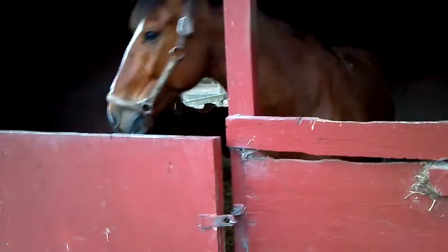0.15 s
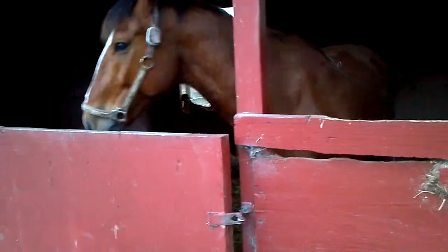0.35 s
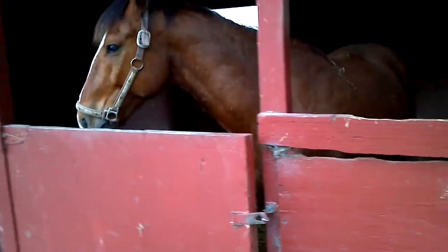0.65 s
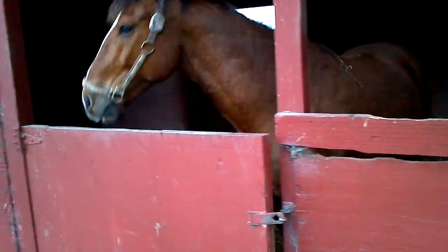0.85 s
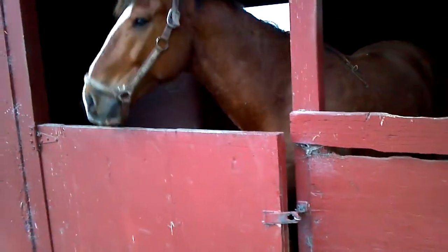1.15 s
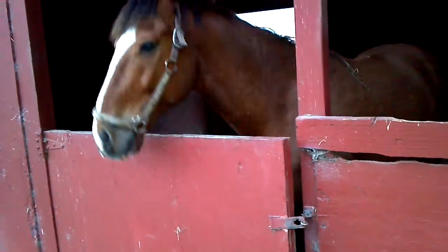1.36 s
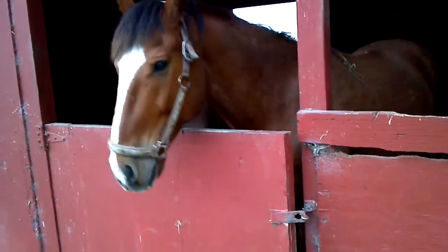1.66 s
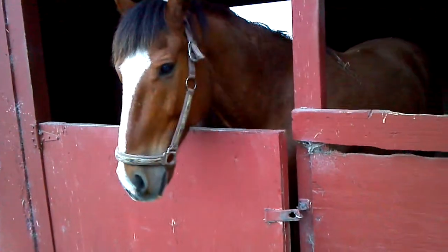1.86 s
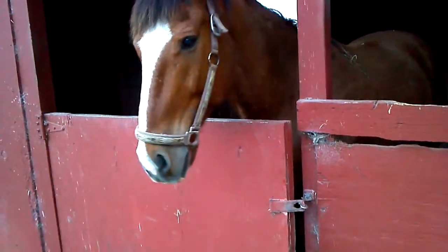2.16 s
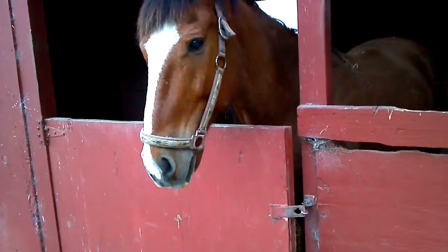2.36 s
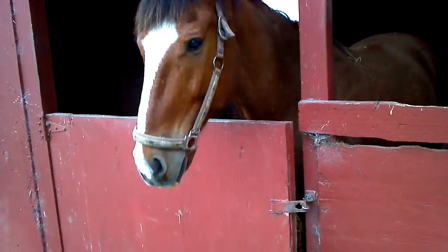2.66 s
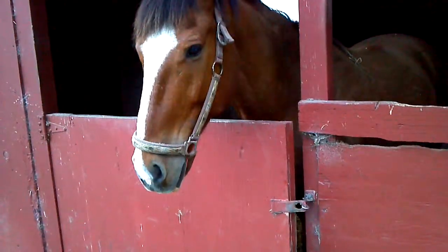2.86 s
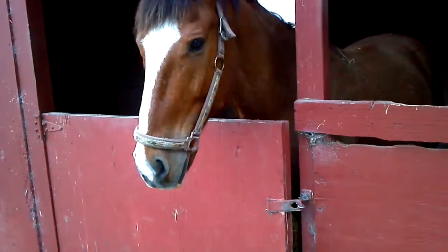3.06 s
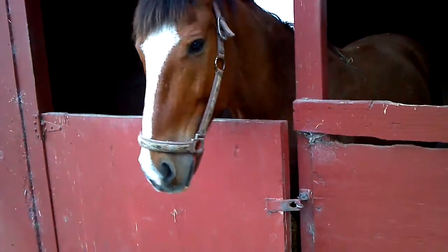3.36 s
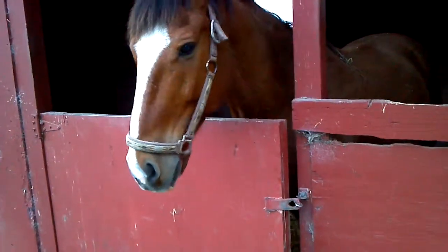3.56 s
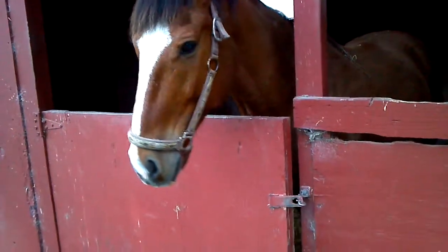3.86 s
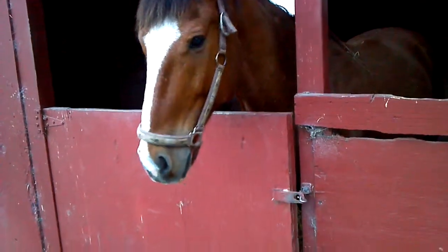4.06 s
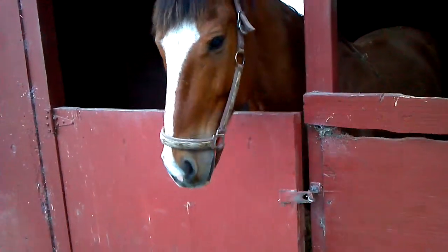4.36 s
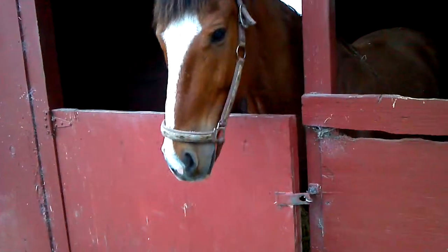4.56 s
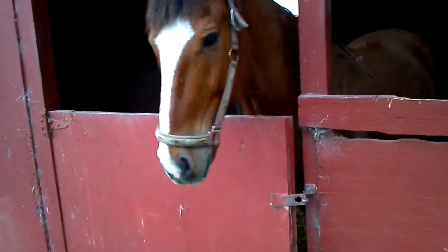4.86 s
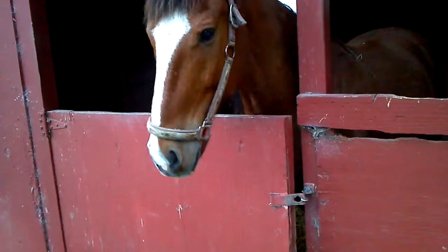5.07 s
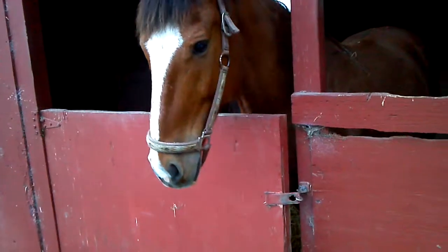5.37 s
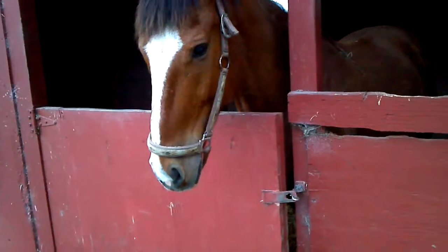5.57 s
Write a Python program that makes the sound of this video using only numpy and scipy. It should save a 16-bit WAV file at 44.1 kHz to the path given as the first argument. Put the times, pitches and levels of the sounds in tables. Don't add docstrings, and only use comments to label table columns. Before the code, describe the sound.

A quiet stable yard with steady far traffic roar and faint hiss. Small birds pipe and trill during the first second or so, with light hay rustles. After a calm stretch, a horse strikes its plank stall door hard, then again about a second later in a longer cluster of dull booming thuds. A loose steel bolt clacks and clinks sharply. Close, widened stereo pickup, with the loudest hits slightly overloaded.

```python
import sys
import numpy as np
from scipy import signal
from scipy.fft import rfft, irfft, next_fast_len
from scipy.io import wavfile
from scipy.ndimage import uniform_filter1d

SR = 44100
rng = np.random.default_rng(int(sys.argv[2]) if len(sys.argv) > 2 else 0)


def master(y):
    cut = np.clip(np.atleast_2d(y).T, -1, 1)
    pcm = np.round(cut * 32767)
    wavfile.write(sys.argv[1], SR, pcm.astype(np.int16))


def boost(x):
    u = np.asarray(x, float) / 20
    return 10 ** u


N = 251811
HZ = np.fft.rfftfreq(next_fast_len(N + SR), 1 / SR) + 1e-3


def at_hz(points, hz, axis=1):
    points = np.array(points)
    return np.interp(np.log(hz), np.log(points[:, 0]), points[:, axis])


def in_time(rows, axis=1):
    rows = np.array(rows)
    return np.interp(np.arange(N) / SR, rows[:, 0], rows[:, axis])


def shaped(x, response):
    size = 2 * (len(HZ) - 1)
    return irfft(rfft(x, size) * response, size)[..., :N]


def rms_one(x):
    return x / np.sqrt(np.mean(x ** 2) + 1e-20)


def band(x, low_hz, high_hz):
    return signal.sosfilt(signal.butter(2, [low_hz, high_hz], "band", fs=SR, output="sos"), x)


def rings(modes, scatter_db, seconds):
    t = np.arange(int(seconds * SR)) / SR
    out = np.zeros(len(t))
    for (hz, db, t60), extra_db in zip(modes, scatter_db):
        out += boost(db + extra_db - 60 * t / t60) * np.sin(2 * np.pi * hz * t)
    return out


def dying_noise(table, seconds, rise_s):
    t = np.arange(int(seconds * SR)) / SR
    out = np.zeros((2, len(t)))
    edges = 60 * 2 ** np.arange(0, 8.2, .5)
    for low, high in zip(edges, edges[1:]):
        hz = np.sqrt(low * high)
        level_db = at_hz(table, hz) - 60 * t / at_hz(table, hz, axis=2)
        out += boost(level_db) * rms_one(band(rng.standard_normal((2, len(t))), low, high))
    return out * (1 - np.exp(-t / rise_s))


def add(track, sound, start_s):
    i = int(start_s * SR)
    track[..., i:i + sound.shape[-1]] += sound[..., :N - i]


def swells(rows):
    t = np.arange(N) / SR
    power = np.zeros(N)
    for peak_s, db, rise, fall in rows:
        drop_db = np.where(t < peak_s, rise * (peak_s - t), fall * (t - peak_s))
        power += boost(db - drop_db) ** 2
    return np.sqrt(power)


# pitch_hz, level_db
SHADE = [(100, 2.5), (1000, -3), (3000, -9), (7000, 0), (15000, -23)]


def capsules(near, far, lag):
    delay = np.exp(-2j * np.pi * HZ * lag / SR)
    return np.array([near, shaped(far, boost(at_hz(SHADE, HZ)) * delay)])


# pitch_hz, likeness (0-1)
LIKENESS = [(100, 0.87), (500, 0.91), (1000, 0.43), (2000, 0.02), (5000, 0.23), (15000, 0.57)]


def pair_noise(spectrum, lag):
    same, other = rng.standard_normal((2, N))
    alike = np.clip(at_hz(LIKENESS, HZ), 0, 1)
    colour = boost(at_hz(spectrum, HZ))
    near = shaped(same, colour)
    far = shaped(same, colour * alike) + shaped(other, colour * np.sqrt(1 - alike ** 2))
    return capsules(near, far, lag) / np.std(near)


# pitch_hz, level_db (per Hz)
ROAR = [(25, 5), (55, -5.5), (110, 1), (250, 0.55), (500, -2.5), (950, 1.1), (1300, -5), (1800, -10),
        (2400, -14.5), (3300, -23), (5000, -29.5), (9000, -32), (14500, -51), (15600, -58)]
# peak_s, level_db, rise_db_per_s, fall_db_per_s
SHUDDER = [
    (5.0, -43.5, 85, 61),
]


def traffic_roar():
    return (boost(-46) + swells(SHUDDER)) * pair_noise(ROAR, lag=-9.5)


# pitch_hz, level_db (per Hz)
HISS = [(2000, -4), (5000, -1.5), (8000, -18), (11000, 3), (13800, -4.5), (14800, -3), (16000, -28)]


def air_hiss():
    return boost(-71.5) * pair_noise(HISS, lag=-7.5)


# pitch_hz, level_db (per Hz)
RUSTLE = [(1500, 1), (4000, -2.5), (7000, -5), (10500, 3.5), (14000, -3.5), (15000, -1.5), (16000, -16),
          (18000, -24)]


def rustle_noise():
    return boost(2.5) * pair_noise(RUSTLE, lag=-2.7)


# peak_s, level_db, rise_db_per_s, fall_db_per_s
STIRS = [(.016, -55.5, 254, 200), (.08, -71, 200, 55), (.24, -73, 500, 62), (.574, -64, 45, 162),
         (.694, -55, 190, 72), (1.038, -65.5, 900, 120), (2.272, -62.5, 140, 105), (2.562, -55, 1200, 190),
         (3.122, -64, 83, 67), (4.1, -62.5, 60, 58), (4.42, -62, 50, 300), (5.7, -59, 80, 80)]


def hay(rustle):
    return swells(STIRS) * rustle


# start_s, length_s, end_hz, level_db (rms)
PIPES = [(0, .021, 4300, -62), (0.091, 0.064, 4347, -58), (.258, 0.059, 4394, -58),
         (.433, 0.055, 4330, -60), (.612, 0.059, 4480, -62.5), (.69, 0.056, 4400, -63),
         (.815, 0.041, 4355, -60)]
# start_s, level_db (rms)
FLICKS = [(.027, -66), (.201, -65.5), (0.369, -67), (.544, -66), (.726, -64)]
# start_s, length_s, start_hz, end_hz, level_db (rms)
CHIRPS = [
    (0.966, 0.029, 4070, 3150, -57.5),
    (1.103, 0.0089, 2340, 2280, -53),
    (1.41, .09, 7100, 6900, -84),
    (1.886, .11, 7150, 7040, -79.5),
    (2.75, 0.059, 3910, 3960, -75),
    (5.501, 0.099, 4030, 4020, -72),
]


def notes():
    pipes = [(s, length, end + 143, end, 0.03, db) for s, length, end, db in PIPES]
    flicks = [(s, .028, 6900, 8500, .011, db) for s, db in FLICKS]
    chirps = [(s, length, start, end, 0.253 * length, db) for s, length, start, end, db in CHIRPS]
    return pipes + flicks + chirps


# time_s, centre_hz, level_db (rms)
TRILL = [(1.078, 6220, -64), (1.095, 6050, -57), (1.12, 5970, -55.5), (1.3, 5920, -58.5),
         (1.345, 5840, -65), (1.362, 5860, -80)]


def trill():
    t, warble_hz = np.arange(N) / SR, 303.5
    unsteady = rms_one(band(rng.standard_normal(N), 15, 60))
    warble = .8 * np.sin(2 * np.pi * warble_hz * t) + .6 * unsteady
    throb = 1 + .25 * np.cos(2 * np.pi * warble_hz * t)
    sounding = (t > TRILL[0][0]) & (t < TRILL[-1][0])
    level = sounding * throb * boost(in_time(TRILL, axis=2) + unsteady)
    return level * np.sin(2 * np.pi * np.cumsum(in_time(TRILL)) / SR + warble)


def birds():
    dry = np.zeros(N)
    for s, length, start_hz, end_hz, glide_s, db in notes():
        t = np.arange(int(length * SR)) / SR
        hz = end_hz + (start_hz - end_hz) * np.exp(-t / glide_s)
        breath = np.sin(np.pi * t / length) ** .5
        add(dry, boost(db + 4.0) * breath * np.sin(2 * np.pi * np.cumsum(hz) / SR), s)
    dry += trill()
    yard = [(2200, -4, .4), (3300, -2, 0.86), (4380, 3.0, 1.0), (6040, -15, .25), (8300, 9.5, 0.6)]
    tail = dying_noise(yard, 0.72, 0.0025)
    wet = boost(-44.5) * signal.fftconvolve(dry[None], tail, axes=1)[:, :N]
    return capsules(boost(5.5) * dry + wet[0], boost(3) * dry + wet[1], lag=-4.5)


# start_s, level_db (peak), body_db, graze_ahead_s, graze_db
CLACKS = [(3.6381, -19.5, 1, 0.0068, -23), (3.6981, -35.5, 4.5, 0.0089, -35.5),
          (4.4432, -6, -2, 0.0052, -19.5), (4.5493, -19.5, -4.5, 0.007, -26.5),
          (4.6274, -25, -17, 0.0071, -32), (4.8479, -15, -5.5, 0.006, -20.5),
          (4.8549, -12, -2.5, .0033, -15.5), (5.0482, -15, -2, 0.0041, -23),
          (5.1545, -22.5, -3, .0056, -24.5), (5.5468, -22, -11.5, .005, -42),
          (5.6093, -25.5, -9.5, 0.005, -35)]
# start_s, level_db (peak), body_db, middle_db
TICKS = [(1.041, -50, 3, -12), (1.0598, -56, 10, -7), (2.5591, -37.5, -6, -15), (3.661, -36, 8, -5),
         (3.7204, -37, -9, -15), (3.7713, -43, -3, -12), (3.8011, -26, -3.5, -20), (3.8387, -21.5, -9, -36),
         (4.188, -50, 5.5, -12), (4.241, -49.5, 3, -7), (4.4479, -7.5, -11, -22), (4.592, -30.5, -4, -13),
         (4.721, -49, 10, -5), (4.8612, -21, -12, -11), (5.0124, -34, 3, -5.5), (5.0232, -35, 7.5, -20),
         (5.063, -37, -14, -6), (5.089, -45, 11, -10), (5.14, -44, 9, -9), (5.166, -23, -4, -16),
         (5.177, -21.5, 1, -12.5), (5.186, -47, 8, -16)]


def contacts():
    pairs = []
    for s, db, body_db, ahead_s, graze_db in CLACKS:
        pairs.append((s - ahead_s, graze_db, body_db + 4))
        pairs.append((s, db, body_db))
    return [(s, db, body_db, body_db - 14.5) for s, db, body_db in pairs] + TICKS


# pitch_hz, width_hz, level_db
BOLT = [(920, 530, -4.5), (1840, 680, -2), (3010, 1310, -5), (3800, 1780, 0)]
# pitch_hz, level_db, t60_s
STEEL = [(5310, -14, 0.025), (8900, -12.5, 0.028), (11100, -10.5, 0.04), (11600, 0, 0.0059),
         (12900, -25, .02), (14500, -0.5, 0.023)]


def latch_contact(db, bolt_db, middle_db, swell_s):
    t = np.arange(int(.05 * SR)) / SR
    grit = rng.standard_normal(len(t)) * boost(5 * rng.standard_normal(len(t)))
    clicks = rms_one(grit) * np.sqrt(t / swell_s) * np.exp(1 - t / swell_s)
    bolt = np.zeros(len(t))
    for hz, width, level_db in BOLT:
        fill = np.sqrt(SR / 8 / width)
        bolt += boost(level_db) * fill * band(clicks, hz - width / 2, hz + width / 2)
    steel = rings(STEEL, rng.normal(0, 4.5, len(STEEL)), .03)
    top_db = -22 + .15 * (db + 25)
    bright = band(clicks, 8720, 12700) + boost(-34) * np.convolve(clicks, steel)[:len(t)]
    bright += boost(middle_db + 15) * band(clicks, 6280, 10220)
    bright += boost(top_db) * band(clicks, 12100, 14500)
    return boost(db - 4.5) * (bright + boost(bolt_db) * bolt)


# start_s, pitch_hz, level_db
CLINKS = [(3.639, 12900, -46), (3.6393, 6830, -27), (3.801, 10570, -36), (3.8011, 5660, -37),
          (3.83, 3670, -49), (3.839, 14700, -36), (3.8391, 5070, -36), (3.852, 3680, -39),
          (4.075, 10670, -51), (4.19, 3640, -45), (4.445, 9600, -36), (4.447, 12800, -30),
          (4.61, 3670, -41.5), (4.628, 14600, -39), (4.628, 8900, -33.5), (4.63, 11600, -38),
          (5.123, 4160, -43), (5.152, 9030, -29), (5.19, 12950, -53), (5.547, 11600, -36),
          (5.548, 10100, -35.5), (5.549, 5020, -34), (5.611, 11600, -35), (5.6114, 3720, -38.5),
          (5.6112, 10540, -39), (5.611, 8900, -27)]
# pitch_hz, t60_s
CLINK_T60 = [(3700, 0.038), (6600, 0.021), (8900, 0.047), (10500, 0.095), (11600, 0.049), (12800, 0.092),
             (14650, .07)]
# start_s, pitch_hz, level_db, t60_s
CLANGS = [
    (3.802, 8900, -48, 0.18),
    (4.401, 9950, -54.5, 0.6),
    (4.4445, 3700, -10, 0.013),
    (4.4452, 3300, -13, .015),
    (4.4454, 4000, -18, .01),
    (4.853, 3800, -15, 0.024),
    (4.855, 3500, -26, 0.013),
    (5.024, 4540, -30, 0.016),
    (5.048, 4000, -22, 0.013),
    (5.195, 9550, -53.5, 0.41),
]


def latch():
    dry, swell_s = np.zeros(N), .0021
    for s, db, bolt_db, middle_db in contacts():
        add(dry, latch_contact(db, bolt_db, middle_db, swell_s), s - .2 * swell_s)
    clinks = [(s, hz, db, at_hz(CLINK_T60, hz)) for s, hz, db in CLINKS]
    onset = 1 - np.exp(-np.arange(SR // 2) / 40)
    for s, hz, db, t60 in clinks + CLANGS:
        add(dry, rings([(hz, db, t60)], [0], .5) * onset, s)
    tail = dying_noise([(502, -3.0, 0.11), (3000, -10.0, 0.19), (15000, -6, 0.13)], 0.36, 0.001)
    wet = boost(-41.5) * signal.fftconvolve(dry[None], tail, axes=1)[:, :N]
    return capsules(dry + wet[0], boost(-24.0) * dry + wet[1], lag=2.03)


# start_s, level_db (peak), contact_cut_hz, favoured_pitch_hz, snap_db
KNOCKS = [
    (3.6313, -3, 1600, 300, 8.5),
    (3.6894, -14.5, 1450, 345, 1),
    (4.4442, -25.5, 1200, 300, 0),
    (4.7219, -13, 810, 238, 7.5),
    (4.8947, -13.5, 980, 248, 9),
    (5.0148, -12.5, 845, 168, 4),
]
# start_s, level_db (peak), contact_cut_hz, favoured_pitch_hz
REBOUNDS = [
    (3.661, -34, 1090, 300),
    (4.921, -18, 800, 240),
    (5.027, -13, 517, 330),
    (5.07, -24, 800, 240),
    (5.177, -25.5, 995, 300),
]


def blows():
    knocks = [(s, db, cut, 3.44 - 5.5 * np.log2(cut / 1000), spot, snap) for s, db, cut, spot, snap in KNOCKS]
    return knocks + [(s, db, cut, -3.5, spot, -10) for s, db, cut, spot in REBOUNDS]


# pitch_hz, level_db, t60_s
PANEL = [(118, -3.5, 0.245), (152, 3, 0.22), (198, -10, 0.17), (238, -1, 0.24), (321, -6.5, 0.063),
         (345, 0, 0.11)]
# pitch_hz, level_db, t60_s
PLANKS = [(451, -11.5, 0.15), (502, -9.5, 0.08), (595, -6, 0.079), (661, -4, 0.031), (729, -8.5, 0.069),
          (772, -16, 0.05), (970, -9, 0.022), (1260, -28, .08), (1508, -13.5, 0.023), (1845, -3, 0.015)]
# pitch_hz, level_db, t60_s
STALL = [(80, -17, 0.6), (142, 4, 0.61), (300, -0.5, 0.5), (600, -5.5, 0.37), (1200, -19.5, 0.37),
         (2500, -13, 0.42), (6000, -38, 0.193)]


def door_blow(cut_hz, boom_db, spot_hz, snap_db):
    free = (cut_hz / 1500) ** .5
    modes = [(hz * free ** 0.23, db - 8.5 * abs(np.log2(hz / spot_hz)), t60 * free) for hz, db, t60 in PANEL]
    panel = boost(boom_db) * rings(modes, rng.normal(0, 1.5, len(PANEL)), .6)
    n = np.arange(len(panel))
    panel *= boost(-260 * np.maximum(n / SR - .042, 0))
    planks = rings(PLANKS, rng.normal(0, 1.5, len(PLANKS)), .6)
    snap = boost(snap_db) * rings([(900, 0.0064, 0.0023)], [0], .6)
    body = boost(-6.0) * (panel + planks) * (1 - np.exp(-n / 45)) + snap
    tail = dying_noise([(hz, db + .4 * boom_db * (hz < 400), t60 * free) for hz, db, t60 in STALL], .6, .003)
    tail[1] = 0.73 * tail[0] + 0.089 * tail[1]
    soft = signal.butter(3, np.clip(1.45 * cut_hz, 200, 9000), fs=SR, output="sos")
    return boost(2.0) * signal.sosfilt(soft, body + boost(-19.5) * tail)


def door():
    out = np.zeros((2, N))
    for s, db, cut_hz, boom_db, spot_hz, snap_db in blows():
        add(out, boost(db) * door_blow(cut_hz, boom_db, spot_hz, snap_db), s)
    out = signal.sosfilt(signal.butter(3, 95, "high", fs=SR, output="sos"), out)
    return capsules(*out, lag=9.2 / (1 + (HZ / 500) ** 2))


# peak_s, level_db
SHIVERS = [
    (3.66, -45.5),
    (3.85, -66),
    (4.47, -50),
    (4.56, -57.5),
    (4.88, -46.5),
    (4.96, -46.5),
    (5.03, -53),
    (5.19, -70),
]


def fittings(rustle):
    shivers = swells([(s, db, 900, 73) for s, db in SHIVERS])
    grain = boost(2.5 * rms_one(band(rng.standard_normal(N), 30, 250)))
    top_cut = signal.butter(6, 12900, fs=SR, output="sos")
    return signal.sosfilt(top_cut, shivers * grain * rustle)


def scene():
    rustle = rustle_noise()
    yard = traffic_roar() + air_hiss() + hay(rustle) + birds()
    return yard + latch() + door() + fittings(rustle)


def ducked(x):
    from_db, most_db, release_db_per_s, attack_s = -36, 3.5, 7, 0.054
    power = uniform_filter1d(np.mean(x ** 2, axis=0), size=441)
    level_db = 10 * np.log10(np.abs(power) + 1e-12)
    ramp = release_db_per_s * np.arange(N) / SR
    cut_db = np.maximum.accumulate(np.clip(level_db - from_db, 0, most_db) + ramp) - ramp
    r = np.exp(-1 / (attack_s * SR))
    return x * boost(-signal.lfilter([1 - r], [1, -r], cut_db))


def band_limit(x):
    return signal.sosfilt(signal.butter(12, 16810, fs=SR, output="sos"), x)


def record(dry):
    near = signal.lfilter(*signal.butter(1, 100, "high", fs=SR), dry[0])
    far = signal.lfilter(*signal.butter(1, 50, "high", fs=SR), dry[1])
    late = np.pad([far, near], [(0, 0), (16, 0)])[:, :N]
    wide = (np.array([near, far]) - 1.18 * late) * boost(np.array([[-.9], [.9]]))
    wide = signal.sosfilt(signal.butter(8, 15700, fs=SR, output="sos"), ducked(wide))
    mix = wide / (1 + np.abs(wide / .985) ** 8) ** (1 / 8)
    return band_limit(mix)


dry = scene()
out = record(dry)
master(out)
```